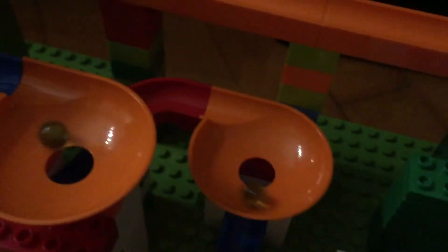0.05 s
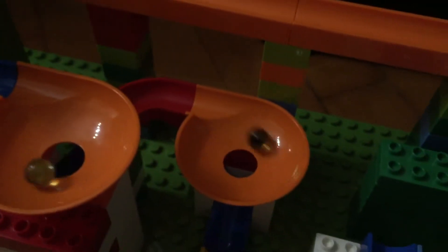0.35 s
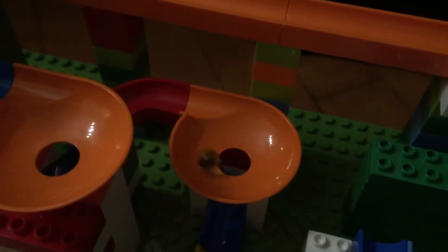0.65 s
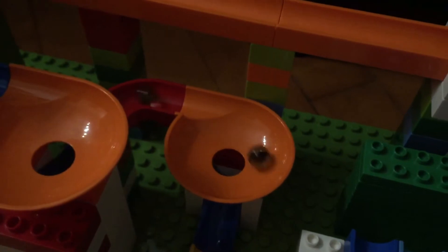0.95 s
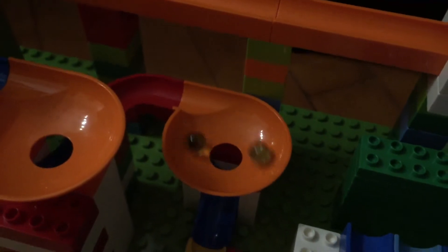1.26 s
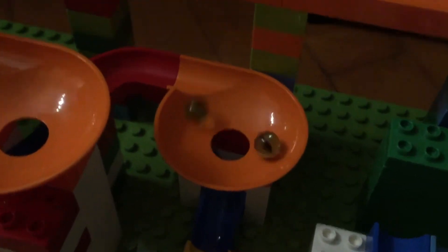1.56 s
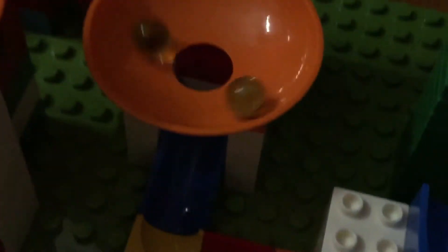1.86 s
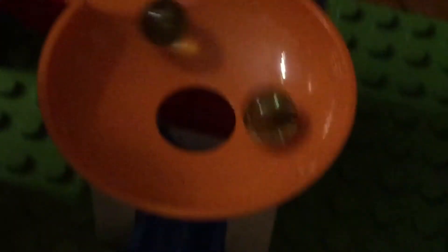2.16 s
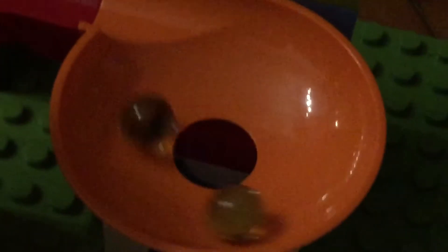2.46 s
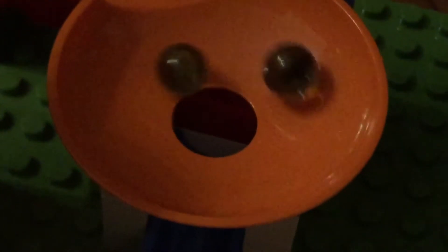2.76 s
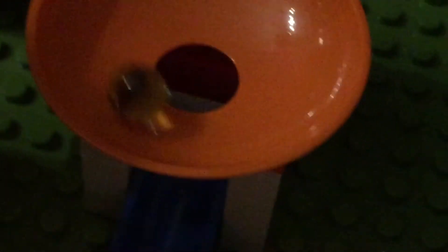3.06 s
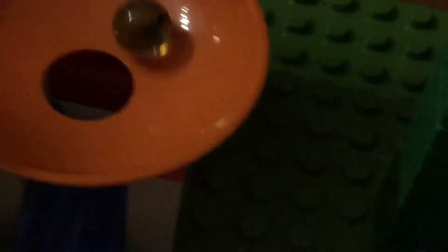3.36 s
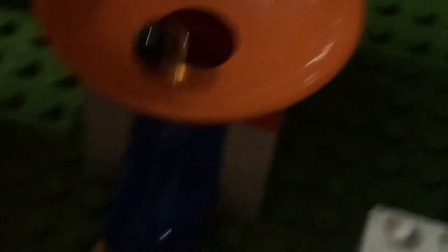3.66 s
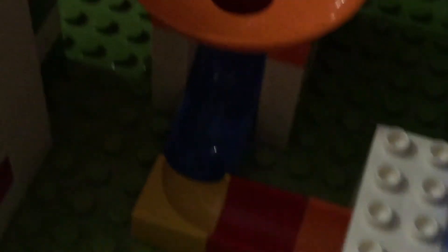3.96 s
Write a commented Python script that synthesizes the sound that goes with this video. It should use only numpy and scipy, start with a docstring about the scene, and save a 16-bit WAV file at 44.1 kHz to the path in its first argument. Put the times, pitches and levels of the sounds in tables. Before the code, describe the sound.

Marbles circle in the plastic bowls of a marble run, heard up close in a quiet room. A sharp drop and rattling lead to a bright glass clack, then a louder bouncing fall, soft microphone bumps and hollow rolling.

```python
"""Glass marbles in a marble run

Marbles circle in plastic funnels, close by, in a quiet room. Rolling is a stream of tiny impacts
that ring the bowl. The marbles rattle on the plastic, clack together and drop through the holes into
the chutes below, where one rolls on. The microphone is bumped softly."""
import sys
import numpy as np
from scipy import signal
from scipy.fft import rfft, irfft
from scipy.io import wavfile
from scipy.ndimage import uniform_filter1d, map_coordinates

SR = 44100
rng = np.random.default_rng(int(sys.argv[2]) if len(sys.argv) > 2 else 0)


def file_out(sig):
    """Save sig as 16-bit WAV at sys.argv[1]."""
    # one column per channel
    cols = np.atleast_2d(sig).T
    # limit, then scale
    lim = np.clip(cols, -1, 1)
    pcm = np.round(lim * 32767).astype(np.int16)
    wavfile.write(sys.argv[1], SR, pcm)


N = 176400
TIME, HZ = np.arange(N) / SR, np.arange(4097) * SR / 8192


def undb(db):
    """Decibels to gain."""
    return 10 ** (np.asarray(db) / 20)


def unit(x):
    """Scale to an rms of 1."""
    return x / np.sqrt(np.mean(x ** 2))


def add(out, start_s, x):
    """Mix a sound in at its time."""
    i = max(int(start_s * SR), 0)
    out[i:i + len(x)] += x[:max(N - i, 0)]


def lowpass(x, hz, order=2):
    """Low-pass without delay."""
    return signal.sosfiltfilt(signal.butter(order, hz, fs=SR, output="sos"), x)


def wander(turns_per_s):
    """Smooth random motion, rms 1."""
    knots = rng.standard_normal(4096)
    return unit(np.interp(TIME * turns_per_s, np.arange(len(knots)), knots))


def colour(curve, modes=()):
    """A body's gain at each frequency: a broad curve with resonance peaks."""
    hz, db = np.array(curve, float).T
    broad = undb(np.interp(np.log(HZ + 1), np.log(hz), db))
    peaks = sum((undb(2 * lift_db) - 1) / (1 + (2 * (HZ - centre_hz) / width_hz) ** 2)
                for centre_hz, width_hz, lift_db in modes)
    bass_cut = HZ ** 2 / (HZ ** 2 + (hz[0] / 2) ** 2)
    return broad * np.sqrt(np.maximum(1 + peaks, .1)) * bass_cut


def spot_colour(depth_db, spacing_at_1khz_hz=75):
    """Each contact spot favours some resonances; they broaden towards the treble."""
    knots = np.clip(rng.standard_normal(1024), -1.5, 1.5)
    place = 2 * np.sqrt(HZ * 1e3) / spacing_at_1khz_hz
    ripple = np.interp(place, np.arange(len(knots)), knots)
    gain = undb(depth_db * np.clip(HZ / 900, 0, 1) * ripple)
    return gain / np.sqrt(uniform_filter1d(gain ** 2, size=250))


def ring(push, body):
    """Pass a push through a minimum-phase body with the given gains."""
    cepstrum = irfft(np.log(body + 1e-7))
    half = len(cepstrum) // 2
    causal = np.r_[cepstrum[0], 2 * cepstrum[1:half], np.zeros(half)]
    response = irfft(np.exp(rfft(causal)))
    return signal.fftconvolve(push, response[:half])[:len(push)]


def bend(x, ratio):
    """Shift all resonances by a moving ratio."""
    return map_coordinates(x, [np.cumsum(ratio)], mode="mirror")


def grains(per_s, spread_db, flutter_db=2.1):
    """Tiny impacts of a marble on a slightly rough surface, in flurries."""
    hit = rng.random(N) < per_s / SR
    size = undb(spread_db * np.clip(rng.standard_normal(N), -2, 2))
    sign = np.sign(rng.standard_normal(N))
    return unit(hit * size * sign * undb(flutter_db * wander(50)))


# Body, mids, treble. Each row: lower edge in Hz, upper edge in Hz.
BANDS_HZ = [(200, 1400), (1400, 5000), (5000, 15000)]


def blows(events, body, trim_db, crest_db, clatter_t60_s, after_db, after_t60_s):
    """Each blow starts a quick clatter and a weak after-ring; hardness sets the balance of three bands."""
    out, t = np.zeros(N), TIME[:len(HZ) - 1]
    fade = undb(-60 * t / clatter_t60_s) + undb(after_db - 60 * t / after_t60_s)
    log_centres = np.log(BANDS_HZ).mean(axis=1)
    rms_window_s = .01
    for start_s, peak_db, body_db, treble_db in events:
        push = rng.standard_normal(len(t)) * fade
        power = np.abs(rfft(push, 2 * len(t))) ** 2
        gain = body * spot_colour(depth_db=3.5) / np.sqrt(uniform_filter1d(power, size=150))
        energy = np.array([np.sum((power * gain ** 2)[(HZ > lo) & (HZ < hi)]) for lo, hi in BANDS_HZ])
        band_db = 10 * np.log10(energy / len(t) / (rms_window_s * SR))
        wanted_db = np.array([body_db, peak_db - crest_db, treble_db]) + trim_db
        hardness_db = np.interp(np.log(HZ + 1), log_centres, wanted_db - band_db)
        add(out, start_s, ring(push, gain * undb(hardness_db)))
    return out


# Each row: frequency in Hz, gain in dB.
AIR_CURVE = [(20, -28), (62, 0), (160, -10), (1000, -20), (16000, -43)]


def room_air(air_db=-60, hum_db=-63, hum_hz=58.5):
    """Still air with a low, wavering hum."""
    hum = np.sin(2 * np.pi * np.cumsum(hum_hz + 1.5 * wander(6)) / SR) * undb(2.5 * wander(7))
    air = ring(rng.standard_normal(N), colour(AIR_CURVE))
    return undb(air_db) * unit(air) + undb(hum_db) * unit(hum)


# Each row: time in seconds, level below the treble in dB, treble level in dB.
FUNNEL_LEVELS = [(0, -41, -60), (0.12, -44, -62), (0.27, -36, -52), (0.35, -45, -63), (0.45, -43, -59),
                 (0.51, -37, -57), (0.58, -45, -68), (0.64, -47, -68), (0.73, -38, -51), (0.85, -42, -56),
                 (0.93, -48, -60), (0.98, -42, -47), (1.11, -45, -58), (1.17, -39, -53), (1.23, -41, -57),
                 (1.33, -35, -48), (1.40, -42, -61), (1.65, -35, -51), (1.72, -43, -61), (1.83, -38, -55),
                 (1.93, -39, -56), (2.0, -48, -65), (2.08, -41, -59), (2.17, -35, -52), (2.33, -48, -66),
                 (2.43, -38, -56), (2.59, -49, -67), (2.76, -42, -61), (2.89, -50, -74), (2.97, -40, -55),
                 (3.07, -45, -64), (3.6, -62, -78), (3.77, -53, -67), (4, -59, -78)]
# Each row: frequency in Hz, gain in dB.
BOWL_CURVE = [(120, -20), (450, -4), (1100, 1.5), (2400, -6.5), (3900, -9), (4800, -18), (6000, -15),
              (10000, -29), (16000, -32)]
# Each row: resonance in Hz, width in Hz, lift in dB.
BOWL_MODES = [(388, 42, 12), (807, 30, 4), (1740, 50, 4), (2860, 90, 3), (3510, 170, 8), (4010, 150, 7),
              (5400, 160, 8)]


def funnel_rolling(spots=16, moves_per_s=18, contrast_db=26, orbits_per_s=2.1, sway=.025):
    """Marbles ring the bowl from changing spots and scrape it in bursts; each orbit sways the tone."""
    impacts, bowl = grains(per_s=2400, spread_db=4), colour(BOWL_CURVE, BOWL_MODES)
    nearness = np.array([undb(contrast_db * wander(moves_per_s * rng.uniform(.75, 1.25)))
                         for _ in range(spots)])
    shares = nearness / np.linalg.norm(nearness, axis=0)
    ringing = sum(ring(impacts * share, bowl * spot_colour(depth_db=9.5)) for share in shares)
    ringing = bend(ringing, 1 + sway * np.sin(2 * np.pi * orbits_per_s * TIME + wander(1)))
    rumble = lowpass(ringing, BANDS_HZ[2][0], order=4)
    scrape = (ringing - rumble) * undb(4 * wander(turns_per_s=45))
    times, rumble_db, scrape_db = np.array(FUNNEL_LEVELS).T
    return (unit(rumble) * undb(np.interp(TIME, times, rumble_db) - .6)
            + unit(scrape) * undb(np.interp(TIME, times, scrape_db) - 1.2))


def knocks(events, body):
    """Light knocks on plastic. The body grows half as fast in dB as the peak: harder is brighter."""
    hits = [(start_s, peak_db, peak_db / 2 - 29, treble_db) for start_s, peak_db, treble_db in events]
    return blows(hits, body, trim_db=-.5, crest_db=11, clatter_t60_s=.022, after_db=-14, after_t60_s=.07)


# Each row: start in seconds, mid peak in dB, treble level in dB.
FUNNEL_KNOCKS = [(0.2790, -27, -44), (0.7370, -25, -47), (1.1442, -15, -42), (1.1568, -18, -53),
                 (1.1836, -18, -49), (1.1908, -18, -47), (1.3128, -22, -37), (1.4141, -23, -52),
                 (1.6166, -23, -49), (1.6780, -25, -48), (1.7753, -25, -57), (1.8511, -24, -47),
                 (1.8696, -22, -48), (2.0330, -29, -50), (2.1130, -26, -48), (2.1280, -24, -45),
                 (2.1619, -21, -46), (2.1760, -17, -45), (2.2432, -27, -50), (2.2676, -24, -48),
                 (2.3759, -29, -49), (2.5630, -30, -51)]


def funnel_rattle():
    """Marbles knock on joints, rim and bowl."""
    return knocks(FUNNEL_KNOCKS, colour(BOWL_CURVE, BOWL_MODES))


# Each row: start in seconds, mid peak in dB, body level in dB, treble level in dB.
CHUTE_BOUNCES = [(0.7807, -5, -21, -19), (0.8004, -8, -22, -19)]
# Each row: frequency in Hz, gain in dB.
CHUTE_CURVE = [(150, -24), (800, -10), (1450, -2), (2200, -9), (5500, -11), (9000, -18), (16000, -28)]
# Each row: resonance in Hz, width in Hz, lift in dB.
CHUTE_MODES = [(551, 28, 15), (1814, 130, 7), (5450, 160, 7)]


def upper_drop():
    """A marble falls from the upper funnel and bounces in the chute."""
    return blows(CHUTE_BOUNCES, colour(CHUTE_CURVE, CHUTE_MODES),
                 trim_db=-1.5, crest_db=12, clatter_t60_s=.017, after_db=-17, after_t60_s=.12)


def chute_rolling(levels, body, sharp_share=0, settle_s=.42):
    """A fallen marble rumbles hollowly along; its tone may start sharp and sink."""
    times, db = np.array(levels).T
    ratio = 1 + sharp_share * np.clip(1 - (TIME - times[0]) / settle_s, 0, 1)
    rumble = bend(ring(grains(per_s=1200, spread_db=3), body), ratio)
    return unit(rumble) * undb(np.interp(TIME, times, db, left=-np.inf, right=-np.inf))


# Each row: time in seconds, rolling level in dB.
LINK_LEVELS = [(0.87, -52), (0.99, -37), (1.12, -41), (1.16, -60)]
# Each row: start in seconds, mid peak in dB, treble level in dB.
LINK_HITS = [(0.8753, -23, -49), (0.9397, -15, -43), (0.9531, -14, -45), (0.9970, -21, -46)]
# Each row: frequency in Hz, gain in dB.
LINK_CURVE = [(300, -19), (900, -5), (1200, -8), (2150, 0), (3700, -18), (6800, -21), (15000, -34)]


def linking_chute():
    """A marble rolls and rattles through the chute between the funnels."""
    body = colour(LINK_CURVE)
    return chute_rolling(LINK_LEVELS, body) + knocks(LINK_HITS, body)


# Each row: start in seconds, mid peak in dB, body level in dB, treble level in dB.
GLASS_HITS = [(2.7096, -16, -39, -21), (2.9853, -30, -48, -29)]
# Each row: frequency in Hz, gain in dB.
GLASS_CURVE = [(150, -22), (3800, -3), (4700, -14), (5700, 0), (8300, 1), (10000, -7)]


def glass_clacks():
    """Glass meets glass in a very short, bright contact."""
    return blows(GLASS_HITS, colour(GLASS_CURVE),
                 trim_db=-2.5, crest_db=14, clatter_t60_s=.0015, after_db=-14, after_t60_s=.026)


# Each row: start in seconds, level in dB, starting pitch in Hz.
MIC_BUMPS = [(2.937, -36, 105), (3.249, -26, 140), (3.267, -28, 100), (3.858, -38, 80)]


def microphone_bumps(rise_s=.005, sag_per_s=9):
    """Soft bumps on the microphone: a few low cycles that sag in pitch."""
    out, t = np.zeros(N), TIME[:SR // 8]
    envelope = t / rise_s * np.exp(1 - t / rise_s)
    for start_s, db, hz in MIC_BUMPS:
        swing = np.sin(2 * np.pi * np.cumsum(hz * np.exp(-sag_per_s * t)) / SR)
        rumble = unit(lowpass(rng.standard_normal(len(t)), 3 * hz))
        add(out, start_s, undb(db) * (swing + undb(-7) * rumble) * envelope)
    return out - lowpass(out, hz=45)


# Each row: start in seconds, mid peak in dB, body level in dB, treble level in dB.
TUBE_BOUNCES = [(3.0849, 4, -13, -10), (3.1379, -9, -15, -23), (3.1570, -19, -26, -38),
                (3.1910, -25, -39, -56), (3.2480, -23, -26, -40), (3.2642, -19, -28, -42),
                (3.2690, -20, -26, -46), (3.2850, -25, -38, -52), (3.3538, -11, -23, -37),
                (3.3680, -20, -27, -51)]
# Each row: frequency in Hz, gain in dB.
TUBE_CURVE = [(100, -14), (720, -16), (1020, 0), (1500, -6), (2100, -10), (2800, -7), (3300, -12),
              (5200, -10), (7300, -20), (10500, -24), (11600, -16), (16000, -25)]
# Each row: resonance in Hz, width in Hz, lift in dB.
TUBE_NEAR_MODES = [(1065, 170, 6), (2800, 240, 7), (4430, 200, 4)]


def tube_drop(near):
    """A marble bounces from the lower funnel down the tube, whose sharp resonances carry only nearby."""
    return blows(TUBE_BOUNCES, colour(TUBE_CURVE, TUBE_NEAR_MODES if near else ()),
                 trim_db=-.8, crest_db=12, clatter_t60_s=.015, after_db=-28, after_t60_s=.07)


# Each row: time in seconds, rolling level in dB.
BOTTOM_LEVELS = [(3.39, -43), (3.445, -39), (3.50, -54), (3.55, -40), (3.59, -54), (3.625, -37),
                 (3.665, -58), (3.70, -41), (3.75, -45), (3.79, -38), (3.91, -45), (3.94, -39), (4, -43)]
# Each row: start in seconds, mid peak in dB, body level in dB, treble level in dB.
BOTTOM_BUMPS = [(3.8703, -31, -28, -70), (3.946, -24, -26, -62)]
# Each row: frequency in Hz, gain in dB.
BOTTOM_CURVE = [(120, -20), (550, -19), (880, -3), (1150, -9), (1600, -9), (2500, -22), (3500, -34),
                (7000, -70)]
# Each row: resonance in Hz, width in Hz, lift in dB.
BOTTOM_MODES = [(870, 190, 4)]


def bottom_track():
    """The marble rolls on along the bottom track with a sinking tone and dull bumps."""
    body = colour(BOTTOM_CURVE, BOTTOM_MODES)
    bumps = blows(BOTTOM_BUMPS, body,
                  trim_db=-1, crest_db=12, clatter_t60_s=.015, after_db=-18, after_t60_s=.06)
    return chute_rolling(BOTTOM_LEVELS, body, sharp_share=.35) + bumps


def room_echo(x, level_db=-18.5, low_t60_s=.55, treble_t60_s=.35, build_s=.006):
    """Echo of a small room; the treble dies first."""
    t, noise = TIME[:SR], rng.standard_normal(SR)
    low = lowpass(noise, hz=4000)
    tail = low * 1e-3 ** (t / low_t60_s) + undb(-6) * (noise - low) * 1e-3 ** (t / treble_t60_s)
    tail *= 1 - np.exp(-t / build_s)
    return undb(level_db) * signal.fftconvolve(x, tail / np.linalg.norm(tail))[:N]


def scene():
    """The marble run and its echo, with microphone bumps and room air, in mono."""
    marbles = funnel_rolling() + funnel_rattle() + upper_drop() + linking_chute()
    marbles += glass_clacks() + bottom_track()
    direct = marbles + tube_drop(near=True)
    echo = room_echo(marbles + tube_drop(near=False))
    return (direct + echo + microphone_bumps() + room_air())[None]


def record(dry, top_hz=16000):
    """Clip at full scale, then cut the top."""
    top_cut = signal.ellip(10, .2, 70, top_hz, fs=SR, output="sos")
    return signal.sosfilt(top_cut, np.clip(dry, -1, 1))


dry = scene()
out = record(dry)
file_out(out)
```